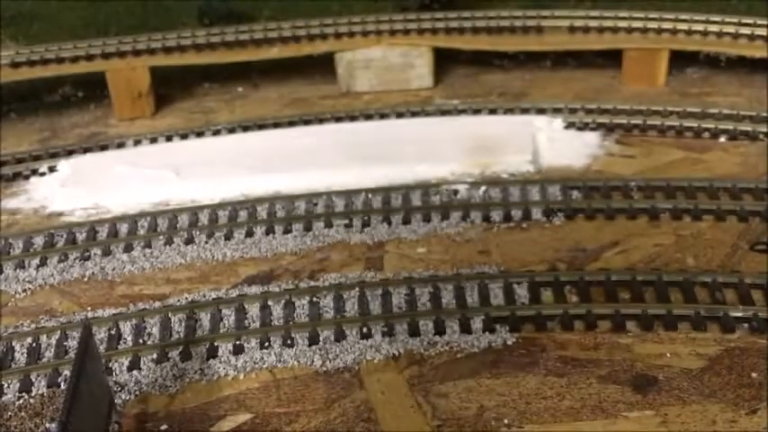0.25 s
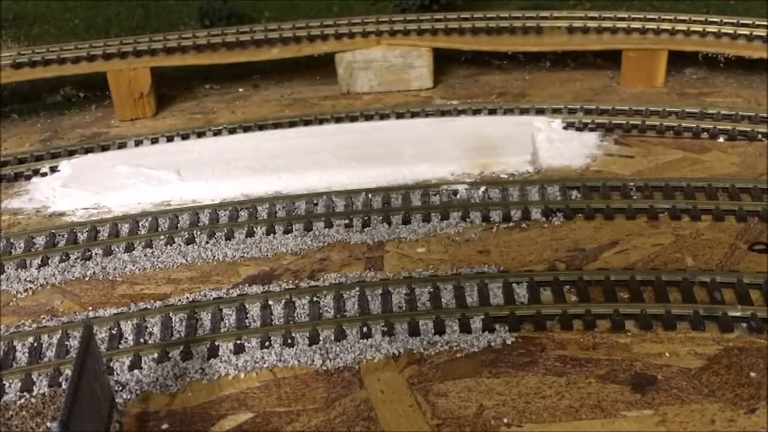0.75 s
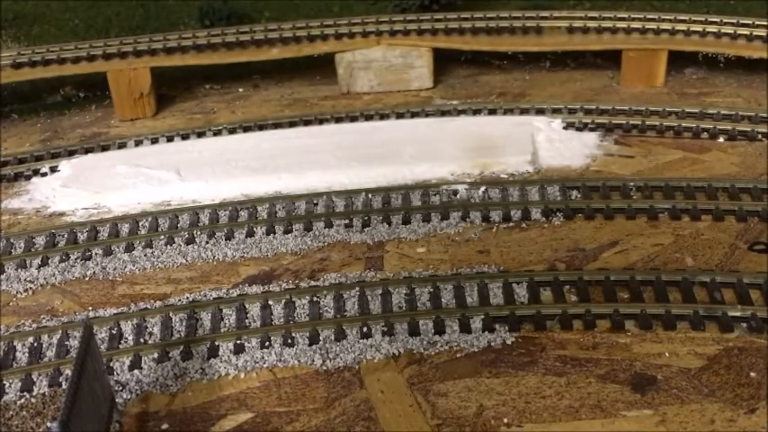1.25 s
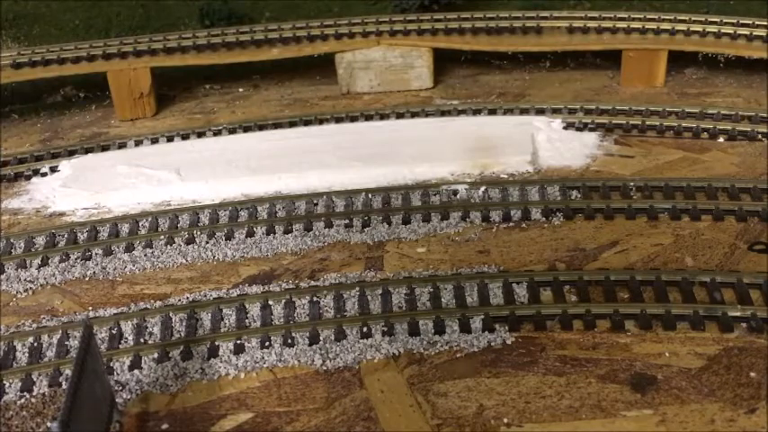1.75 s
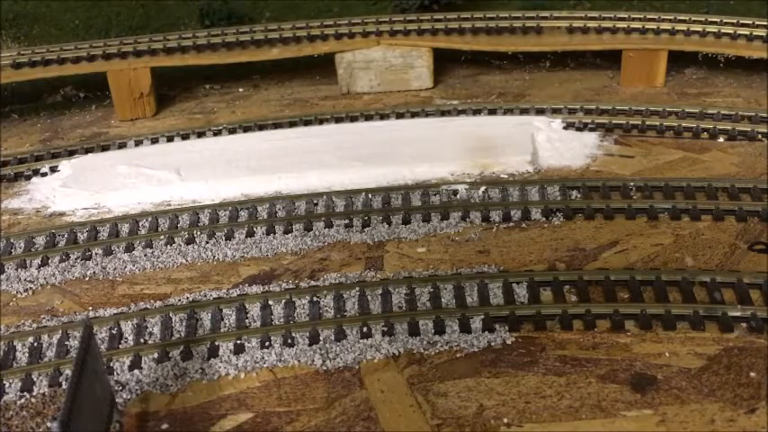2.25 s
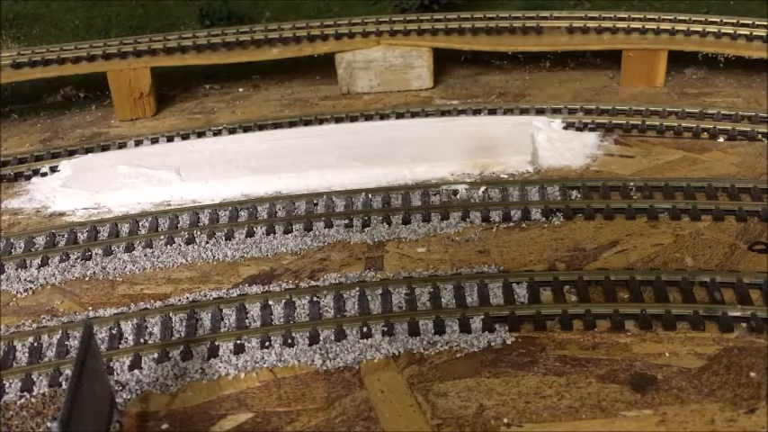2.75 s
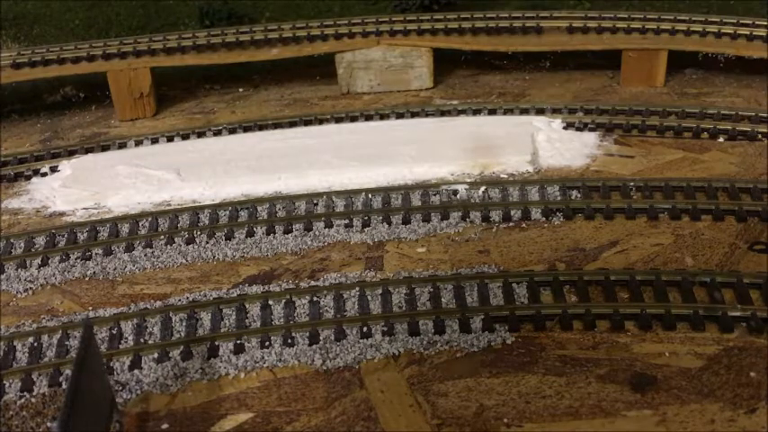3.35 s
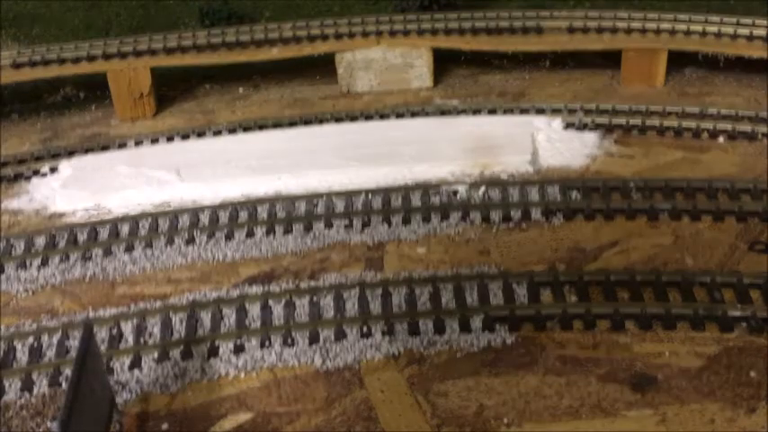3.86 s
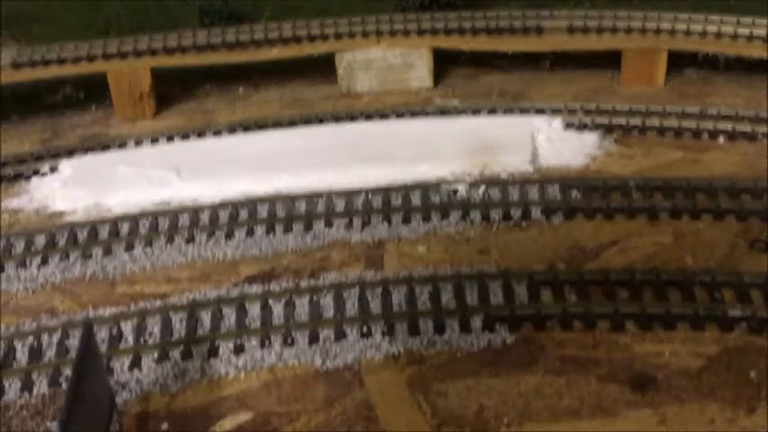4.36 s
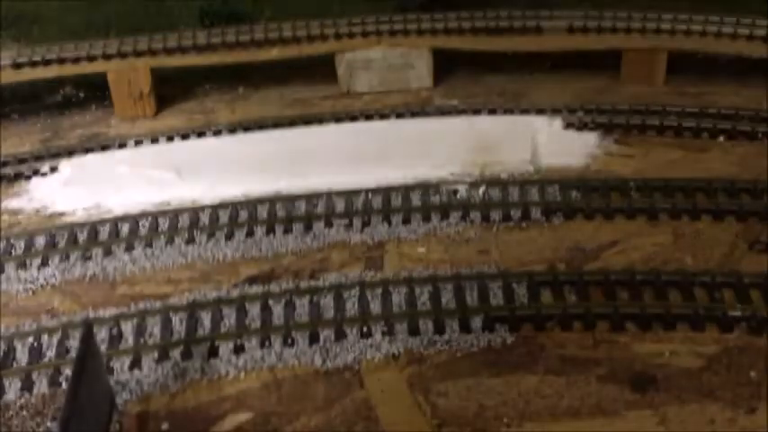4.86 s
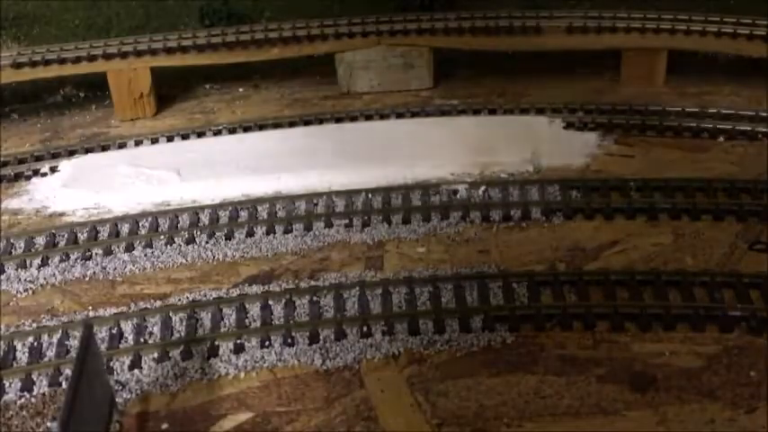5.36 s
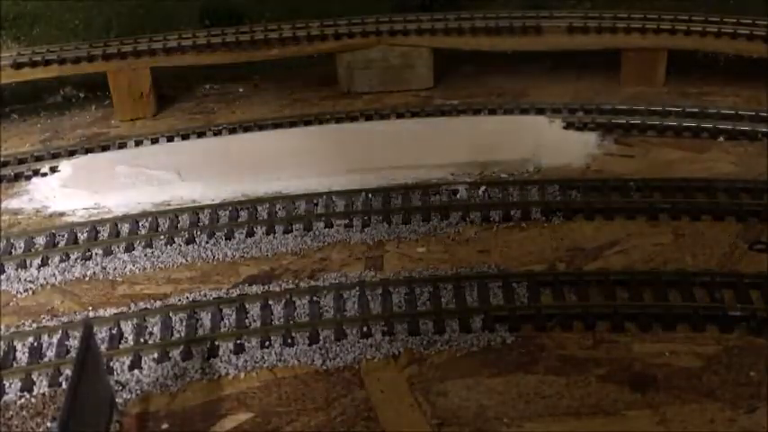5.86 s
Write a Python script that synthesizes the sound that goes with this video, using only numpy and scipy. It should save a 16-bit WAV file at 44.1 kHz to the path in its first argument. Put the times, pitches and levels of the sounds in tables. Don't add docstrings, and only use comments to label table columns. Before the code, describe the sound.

Faint gritty rubbing and dull knocks in a workroom give way to a vacuum's rising whine, loud airy roar and brief hose groan.

```python
import sys
import numpy as np
from scipy import signal
from scipy.fft import rfft, irfft, next_fast_len
from scipy.io import wavfile
from scipy.ndimage import uniform_filter1d, map_coordinates

SR = 44100
rng = np.random.default_rng(int(sys.argv[2]) if len(sys.argv) > 2 else 0)


def materialize(psi):
    bounded = np.clip(np.atleast_2d(psi).T, -1, 1)
    quanta = np.round(bounded * 32767).astype(np.int16)
    wavfile.write(sys.argv[1], SR, quanta)


def gain_from_decibels(decibels):
    exponent = np.asarray(decibels, float) / 20
    return 10 ** exponent


N = 269892
SWITCH_S, FULL_HZ = 2.42, 419.6


def unit(x):
    return x / np.sqrt(np.mean(x ** 2) + 1e-20)


def along(points, hz):
    f, v = np.transpose(points)
    return np.interp(np.log(hz + 1), np.log(f + 1), v)


def curve(rows):
    s, value = np.transpose(rows)
    return np.interp(np.arange(N) / SR, s, value)


def wobble(rate):
    return map_coordinates(rng.standard_normal(int(N * rate / SR) + 4), [np.arange(N) * rate / SR])


def filtered(x, response):
    m = next_fast_len(N + SR // 2)
    return irfft(rfft(x, m) * response(np.fft.rfftfreq(m, 1 / SR)), m)[:N]


def humps(x, rows):
    return filtered(x, lambda f: gain_from_decibels(sum(db / (1 + (2 * (f - c) / w) ** 2) for c, w, db in rows)))


def rush(spectrum, patchy_db, shape=lambda hz, t: 1):
    hz, t, z = signal.stft(rng.standard_normal(N), SR, nperseg=512)
    field = uniform_filter1d(rng.standard_normal(z.shape), size=6, axis=0)
    field = uniform_filter1d(field, size=10, axis=1)
    z = z * gain_from_decibels(patchy_db * unit(field) + along(spectrum, hz)[:, None]) * shape(hz[:, None], t)
    steady = np.sqrt(uniform_filter1d(np.sum(abs(z) ** 2, 0), size=20))
    return unit(signal.istft(z / steady, SR, nperseg=512)[1][:N])


def swells(rows, levels_db, rise, fall):
    t = np.arange(0, N / SR + .01, .002)
    start, length = np.transpose(rows)[:2, :, None]
    before, after = np.clip(start - t, 0, None), np.clip(t - start - length, 0, None)
    db = np.c_[levels_db] - rise * before - fall * after
    return np.interp(np.arange(N) / SR, t, np.sqrt(np.sum(gain_from_decibels(2 * db), 0)))


def switched(fade):
    return np.clip((np.arange(N) / SR - SWITCH_S) / fade + 1, 0, 1)


# turns per second still missing [Hz], time constant [s]
RUN_UP = [(308, .24), (72, .45)]


def shaft(t):
    since = np.clip(t - SWITCH_S, 0, None)
    missing = sum(gap * np.exp(-since / tau) for gap, tau in RUN_UP)
    return FULL_HZ - missing - 1.75 * np.clip(t - 4.45, 0, None)


# f/Hz, time to fall by 60 dB [s]
ROOM_DECAY = [(200, 0.77), (2000, 0.4), (10000, 0.14)]


def room(x, wet_db):
    hop, wet = round(.2 * SR), np.zeros(N + 2 * SR)
    for start in range(round(2.2 * SR), N, hop):
        hz, t, z = signal.stft(rng.standard_normal(SR // 2), SR, nperseg=256)
        tail = signal.istft(z * gain_from_decibels(-60 * t / along(ROOM_DECAY, hz)[:, None]), SR, nperseg=256)[1]
        piece = x[start:][:2 * hop]
        window = np.sin(np.pi * np.arange(len(piece)) / (2 * hop))
        echo = signal.fftconvolve(piece * window, tail / np.linalg.norm(tail))
        wet[start + 150:][:len(echo)] += echo
    return (x + gain_from_decibels(wet_db) * wet[:N]) / np.sqrt(1 + gain_from_decibels(2 * wet_db))


# f/Hz, level/dB per Hz
STILL = [(300, 0), (700, -12.5), (1500, -17.5), (3000, -17.5), (5000, -22.5), (7000, -22), (10500, -22.5),
         (13000, -17.5), (16500, -22)]


def still():
    return gain_from_decibels(-68.5) * rush([(150, -34)] + STILL, 0.76)


# t/s, length [s], level/dB, f/Hz
JOLTS = [(0.03, 0.053, -44, 60.7), (0.163, 0.17, -39, 59), (0.408, 0.036, -46, 94),
         (0.668, 0.065, -48.5, 81), (.8, .05, -54, 140), (1.09, 0.15, -43, 106.4), (1.297, .1, -48.5, 101),
         (1.564, 0.062, -46.5, 69), (1.674, 0.023, -43, 127), (2.027, 0.027, -50.5, 60),
         (2.145, 0.058, -45, 170), (2.313, 0.034, -52, 192), (2.505, 0.097, -48, 180),
         (2.695, 0.22, -42, 70.4), (3.08, 0.016, -37, 179), (3.866, 0.078, -34, 55), (4.15, 0.055, -39, 48),
         (4.257, .02, -39, 170), (4.446, 0.13, -34, 168), (4.923, 0.23, -41, 47.7),
         (5.218, 0.1, -38.5, 40.4), (5.38, 0.09, -40.5, 48), (5.488, 0.04, -42, 150),
         (5.664, 0.028, -45, 170), (5.793, 0.066, -45.5, 60), (5.944, 0.061, -44.5, 119)]
# f/Hz, width [Hz]
BENCH_MODES = [(48, 80), (88, 82), (180, 35)]
REST_DB = [-54.5, -55, -59.5]
# f/Hz, width [Hz], level/dB
OVERTONE = (287, 63, -14)


def bench_ring(c, w):
    response = lambda f: (1j * f * w / (c * c - f * f + 1j * f * w)) ** 2
    return unit(filtered(rng.standard_normal(N), response))


def bench():
    db, hz = np.transpose(JOLTS)[2:]
    out = np.zeros(N)
    for rest_db, (c, w) in zip(REST_DB, BENCH_MODES):
        jolt_db = db - 13 * np.log2(hz / c) ** 2
        level = np.hypot(gain_from_decibels(rest_db + 1.5 * wobble(8.0)), swells(JOLTS, jolt_db, 347, 162))
        out += level * bench_ring(c, w)
    over_hz, width_hz, over_db = OVERTONE
    return out + level * gain_from_decibels(over_db) * bench_ring(over_hz, width_hz)


# t/s, peak level/dB, ring level/dB, ping f/Hz
KNOCKS = [(0.808, -55, -28, 4540), (0.8237, -33, -31, 5200), (0.824, -34.5, -29, 5460),
          (0.824, -39, -26, 4140), (0.836, -41, -30, 5350), (0.827, -31, -19, 1466), (1.396, -48, 0, 1080),
          (1.409, -40, 3.5, 2820), (1.453, -47, -9, 1120), (1.578, -54, -12, 2130), (1.592, -53, -10, 1050),
          (2.419, -39, 4.5, 465)]
# f/Hz, level/dB, time to fall by 60 dB [s]
BLOCK_MODES = [(433, 5, 0.12), (1050, -7, 0.083), (2910, -13, 0.038), (3180, -10, 0.051)]
# t/s, peak level/dB, f/Hz
THUMPS = [(0.187, -17, 87), (0.12, -36, 280), (0.16, -34, 260), (0.2, -32, 290), (0.245, -33, 270),
          (0.292, -31.5, 300), (0.21, -36, 61.7), (0.24, -19, 79), (0.329, -47, 47.7), (1.079, -25, 81.6),
          (1.139, -22.5, 108), (1.298, -30, 91.5), (1.568, -35, 135), (1.595, -25.5, 217), (1.623, -32, 90),
          (1.672, -25, 136), (1.678, -26, 228), (1.7, -46, 149), (2.141, -28, 182), (3.857, -29, 98),
          (4.247, -5, 95.3), (4.236, -18, 184), (4.165, -24, 48), (4.36, -20, 80), (5.03, -27, 46),
          (5.44, -28, 58)]


def knocks():
    out, t = np.zeros(N + SR), np.arange(SR // 4) / SR
    for s, db, ring_db, ping_hz in KNOCKS:
        ring = sum(gain_from_decibels(level + rng.normal(0, 0.8) - 60 * t / t60) * np.sin(2 * np.pi * hz * t)
                   for hz, level, t60 in BLOCK_MODES)
        scrape = np.diff(uniform_filter1d(rng.standard_normal(len(t) + 1), size=7)) * 2.4
        scuff = gain_from_decibels(2.0 - 60 * t / 0.025) * scrape * min(1, 2000 / ping_hz)
        ping = gain_from_decibels(-60 * t / 0.023) * np.sin(2 * np.pi * ping_hz * t)
        tap = (gain_from_decibels(ring_db) * ring + scuff + ping) * (1 - np.exp(-t / 0.002))
        out[round(s * SR):][:len(t)] += gain_from_decibels(db - 5.0) * tap
    for s, db, hz in THUMPS:
        swell = np.exp(-t * hz / 2.1) * (1 - np.exp(-t * hz / 1.24))
        out[round(s * SR):][:len(t)] += gain_from_decibels(db - 3.5) * swell * np.sin(2 * np.pi * hz * t)
    return out[:N]


# t/s, length [s], level/dB, centre f/Hz, width [Hz]
SNAGS = [(.012, .008, -59, 2500, 900), (0.018, .006, -52, 7500, 7000), (.062, .003, -62, 8000, 8000),
         (0.04, 0.02, -52, 2600, 500), (0.067, .005, -55, 2600, 600), (0.112, .006, -64, 2500, 900),
         (0.216, .006, -52, 2700, 800), (0.232, .012, -50, 2300, 2000), (0.248, .015, -58, 2900, 500),
         (0.287, .004, -46, 2200, 2800), (0.299, .005, -54, 2700, 800)]
# t/s, peak level/dB
TICKS = [
    (.81, -50),
    (.8252, -41),
    (.8281, -38),
    (.8293, -38),
    (.8315, -36),
    (.84, -49),
    (.2895, -38),
    (.2925, -36),
    (.299, -41),
    (.301, -41),
]


def snags():
    out, t = np.zeros(N), np.arange(4096) / SR
    f = np.fft.rfftfreq(len(t), 1 / SR)
    for s, length, db, c, w in SNAGS:
        band = unit(irfft(rfft(rng.standard_normal(len(t))) / (1 + (2 * (f - c) / w) ** 4)))
        fade = gain_from_decibels(db - 60 * np.clip(t - length, 0, None) / 0.053)
        out[round(s * SR):][:len(t)] += fade * (1 - np.exp(-t / 0.0012)) * band
    for k, (s, db) in enumerate(TICKS):
        sign = -1 if k == 3 else 1
        tick = np.sin(2 * np.pi * 3000 * t) * np.exp(-t / .00015)
        out[round(s * SR):][:len(t)] += sign * gain_from_decibels(db + 6) * tick
    return out


# t/s, length [s], level/dB, rasp from pressure [dB], hiss from speed [dB]
STROKES = [(0.009, 0.053, -52, -5, 1), (0.107, 0.078, -53.5, 1.5, 0.5), (0.198, 0.067, -50.5, 2, -2),
           (0.29, 0.02, -50.5, 4.5, -5), (.325, .02, -61, 7, -3), (.39, 0.045, -69.5, -3, 3),
           (0.46, 0.12, -62, 2, -2.5), (0.627, .11, -59, 3, 0), (0.76, 0.033, -61.5, 6, -15),
           (0.823, 0.0071, -53, 5, -21), (0.848, 0.018, -57, 2.5, -9), (1.009, 0.019, -65, 8.5, -13),
           (1.083, 0.018, -60, 9, -6), (1.18, .04, -68.5, 7, -0.5), (1.3, .02, -70, 2, -2),
           (1.416, 0.013, -55, 2.5, -4), (1.445, 0.017, -70, 10, -7), (1.582, 0.023, -63, 5.5, -14),
           (1.62, 0.093, -66.5, -2, 4), (1.76, 0.02, -67, -8, 5.5), (2.07, 0.065, -73, 11, -6),
           (2.15, .03, -62.5, -1, -6), (2.186, 0.097, -56.5, 1.5, -8.5), (2.313, .035, -67, 4, -6)]
# f/Hz, level/dB per Hz
GRIT = [(1200, -10.5), (2000, -4), (2700, -2), (4000, -8.5), (5000, -18), (6200, -8), (7500, -28),
        (9000, -67)]
RASP = [(250, 2.5), (420, -4), (700, -8.5), (1100, -6.5), (1700, -8), (2300, -25), (3000, -46)]
HISS = [(5500, -6), (7000, -7), (9000, -5.5), (10600, -7), (13000, -4), (15500, -4.5), (17000, -6)]


def sanding():
    db, press_db, skim_db = np.transpose(STROKES)[2:]
    grit, rasp, hiss = (swells(STROKES, level, 502, 248) for level in (db, db + press_db, db + skim_db))
    catch = 1.6 * wobble(50) + 2.2 * wobble(350)
    out = grit * gain_from_decibels(catch - 3.0) * rush(GRIT, 2.0)
    out += rasp * gain_from_decibels(0.66 * catch - 1.5) * rush(RASP, 2.2)
    return out + hiss * gain_from_decibels(0.5 + 0.33 * catch) * rush(HISS, 2)


# f/Hz, level/dB per Hz
SPARK = [(2500, -8), (4000, -6), (6200, -2), (7400, -9), (8000, -20), (14000, -12), (16000, -16)]
# f/Hz, level/dB per Hz
GULP = [(500, -5), (800, -2), (1200, 7), (1600, 0), (2200, -18), (3500, -26)]
# f/Hz, level/dB per Hz
PUFF = [(1800, -20), (2800, 0), (3300, 0), (4300, 1), (5000, -8), (6200, -1), (9000, -11), (15500, -11)]


def spark():
    t = np.arange(N) / SR - 2.408
    burn = gain_from_decibels(-46 - 60 * np.clip(t - 0.03, 0, None) / 0.34) * np.clip(t / 0.016, 0, 1)
    gulp = (t > .012) * swells([(2.445, 0.083)], [-45], 220, 230)
    puff = swells([(2.51, 0.077)], [-50.5], 300, 100)
    return burn * rush(SPARK, 1.1) + gulp * rush(GULP, 1.4) + puff * rush(PUFF, 2.0)


# f/Hz, width [Hz], level/dB
WHISTLES = [(4343, 40, -52), (4801, 20, -51), (6104, 60, -52), (2311, 30, -54), (759, 30, -51),
            (3339, 30, -52)]
# t/s, length [s]
LIFTED = [
    (4.15, .55),
]


def whistles():
    share = shaft(np.arange(N) / SR) / FULL_HZ
    sing = 1 + swells(LIFTED, [-1.5], 30, 40)
    out = np.zeros(N)
    for c, w, db in WHISTLES:
        tone = unit(filtered(rng.standard_normal(N), lambda f: 1 / (1 + (2 * (f - c) / w) ** 2)))
        out += gain_from_decibels(db) * (sing if c == WHISTLES[0][0] else 1) * tone
    return share ** 12 * out


# t/s, length [s], level/dB, tilt [dB an octave]
TUGS = [
    (4.244, .03, -41.5, 4),
    (4.342, 0.053, -25, -5),
    (4.42, .03, -32, -9),
    (4.47, 0.072, -22.5, -5),
    (4.535, .05, -39.5, 17),
    (4.635, 0.03, -40.5, 15.5),
]
# t/s, ribs per second f/Hz
RIBS = [(4.25, 32.3), (4.35, 37.1), (4.4, 40.3), (4.45, 43), (4.5, 44.4), (4.56, 45.4), (4.65, 51.3),
        (4.72, 55)]
RIB_DB = [-15, 0.5, -14, -16]


def hose():
    turn = 2 * np.pi * np.cumsum(curve(RIBS) * (1 + .008 * wobble(30))) / SR
    db, bright_db = np.transpose(TUGS)[2:]
    out = np.zeros(N)
    for k, level in zip((2, 3, 4, 6), RIB_DB):
        out += swells(TUGS, db + level + bright_db * np.log2(k / 3), 347, 296) * np.sin(k * turn)
    return np.sqrt(2) * out


def air_shape(hz, t):
    slot_hz = 12 * shaft(t)
    near = hz / slot_hz
    lag = 1 - shaft(t) / FULL_HZ
    edge = (1 + near ** 8) ** (-.15 - 0.049 * lag)
    awake = 1 - np.exp(-np.clip(t - SWITCH_S - .022, 0, None) / .022)
    hiss = (1 + (hz / 5000) ** 8) ** (0.18 * awake)
    bunch = 1 + 2.6 * lag * np.exp(-((near - .97) / .08) ** 2)
    lean = np.clip(np.maximum(hz, 1300) / slot_hz, .1, 1) ** (0.17 * lag)
    growl = 1 + 0.9 * lag / (1 + (hz / 735) ** 4)
    return edge * hiss * bunch * lean * growl


# f/Hz, level/dB per Hz
ROAR = [(200, -26), (300, -19.5), (450, -16.5), (520, -28.5), (650, -16), (800, -23), (950, -16),
        (1300, -15.5), (1800, -17), (2300, -18.5), (2900, -15), (4200, -20), (5200, -21.5), (7000, -31)]
JET = [(3500, -24), (5000, -3.5), (6100, 5.5), (7000, 0.5), (8000, -2.5), (9300, 2), (11000, -7),
       (13800, -6), (15500, -13), (15900, -18)]
# f/Hz, width [Hz], level/dB
CASING = [(472, 26, 5), (757.5, 53, 8), (1129, 190, 3.5), (1204, 48, -3.5), (1353, 153, 3.5),
          (1617, 200, 3), (1820, 99, -1.5), (1987, 260, 3), (2360, 40, 3), (2600, 31, -1), (2870, 110, 2.5),
          (3318, 130, 4), (4217, 125, 5), (4830, 59, -6)]
NOZZLE = [(6110, 200, 5.5), (6870, 170, 6), (7690, 280, 5), (7930, 240, -4), (9010, 200, 2.5),
          (9600, 390, 2), (10450, 350, -7), (11200, 300, 3), (11700, 400, -16), (12300, 300, 8),
          (12500, 440, 4), (13730, 300, 9), (14400, 400, -4), (15400, 500, 2)]


def air():
    share = shaft(np.arange(N) / SR) / FULL_HZ
    gust = 0.37 * wobble(8) + 0.76 * wobble(300)
    roar = (share ** 1.84 + 0.061) * gain_from_decibels(-29 - 1.5 + gust) * humps(rush(ROAR, 1.2, air_shape), CASING)
    jet = (share ** 2.5 + 0.035) * gain_from_decibels(-35.5 - 3.0 + gust) * humps(rush(JET, 0.84), NOZZLE)
    return switched(0.024) * (room(roar, -7) + room(jet, -5.5))


# f/Hz, level/dB
MOUNT = [(120, -75), (180, -36), (210, -29), (240, -39), (265, -24), (290, -36), (312, -32), (328, -44),
         (345, -30), (358, -36), (372, -27), (385, -26.5), (419, -26)]
# t/s, level/dB
NEAR = [(3.3, -3), (3.62, 1), (3.95, -1.5), (4.15, 0), (5.1, 0.6), (6.12, -2.5)]
# f/Hz, level/dB
BLADES = [(1300, -66), (2050, -46), (2270, -45), (2390, -57), (2428, -33), (2465, -50), (2490, -38),
          (2495, -46), (2510, -41)]
# f/Hz, level/dB
SLOTS = [(800, -62), (1250, -50), (1650, -50), (2100, -55), (2500, -49), (2750, -47), (3050, -52),
         (3350, -45), (3600, -47), (3850, -43), (4100, -45), (4350, -41), (4600, -43), (4800, -44),
         (4900, -47), (4990, -51), (5030, -50)]
TWICE = [(2500, -72), (3300, -56), (3800, -64), (4350, -53), (4900, -66), (6200, -62), (7000, -72)]
ORDERS_AT = [2, 8, 24]
ORDERS_DB = [(-45, 0.45), (-58, 0.54), (-57, 0.6)]


def motor():
    t = np.arange(N) / SR
    speed = shaft(t)
    lag, turn = abs(1 - speed / FULL_HZ), 2 * np.pi * np.cumsum(speed) / SR
    out = gain_from_decibels(along(MOUNT, speed) + curve(NEAR) + 0.49 * wobble(25)) * np.sin(turn + 0.16 * wobble(38))
    blade_db = along(BLADES, 6 * speed) + .8 * wobble(7) + 1.5 * wobble(20)
    out += gain_from_decibels(blade_db) * np.sin(6 * turn + .3 * wobble(25))
    slot_db = along(SLOTS, 12 * speed) + 1.5 * wobble(6) + 2.2 * wobble(30)
    out += gain_from_decibels(slot_db) * np.sin(12 * turn + (.5 + .5 * lag ** 2) * wobble(70))
    out += gain_from_decibels(along(TWICE, 24 * speed) + 2.5 * wobble(40)) * np.sin(24 * turn + 2.5 * wobble(600))
    for k, (db, waver) in zip(ORDERS_AT, ORDERS_DB):
        level = gain_from_decibels(db - 1.5 + 4 * wobble(4)) * (speed / FULL_HZ) ** 4
        out += level * np.sin(k * turn + waver * wobble(25))
    hum_hz, rise = 100, 1 - np.exp(-np.clip(t - SWITCH_S, 0, None) / 0.087)
    hum_db = -41.5 + 16.5 * lag ** 0.58 + 1.3 * wobble(14)
    hum = rise * gain_from_decibels(hum_db) * np.sin(2 * np.pi * hum_hz * t + 0.3 * wobble(4.5))
    buzz = rise * gain_from_decibels(-40.5) * np.exp(-abs(t - SWITCH_S) / 0.11) * np.sin(8 * np.pi * hum_hz * t)
    return np.sqrt(2) * (out * switched(0.0068) + hum + buzz)


def scene():
    background = still() + bench() + knocks() + snags()
    mono = background + sanding() + spark() + whistles() + hose() + air() + motor()
    return np.array([mono, mono])


COARSE_AT = [7.2, 22, 29, 31, 32, 38, 40, 50.85, 77, 86, 89, 126, 145, 146, 151, 154, 156, 162, 165, 178,
             186, 197, 218, 220, 221, 225, 227, 269, 272, 274, 277]
# f/Hz, rounding step [local rms]
COARSENESS = [(300, 0.16), (700, 1.8), (2000, 2.6), (6000, 3.1), (9000, 4.39), (15000, 5.4)]
EXTRA_DB = 2.3, .4
SHARP = [7.2, 50.85]
EMPTY_OVER = {7.2: 4400, 38: 5800, 50.85: 4900, 126: 5600}


def coarse_moments(x):
    hop = 1024 * 44100 / 48000
    m = round(hop)
    n, k = np.arange(2 * m), np.arange(m)
    hz = k * SR / (2 * m)
    sharp = signal.windows.kaiser_bessel_derived(2 * m, 4 * np.pi)
    window = np.where(np.isin(COARSE_AT, SHARP)[:, None], sharp, np.sin(np.pi * (n + .5) / (2 * m)))
    basis = np.cos(np.pi / m * np.outer(k + .5, n + .5 + m / 2)) * np.sqrt(2 / m)
    spots = np.round(740 + hop * np.array(COARSE_AT)).astype(int)[:, None] - m + n
    lines = (x[spots] * window) @ basis.T
    local = np.sqrt(abs(uniform_filter1d(lines ** 2, size=40, axis=1))) + 1e-9
    luck_db = 1.1 * np.repeat(rng.standard_normal((len(COARSE_AT), 60)), 16, axis=1)[:, :m]
    luck = gain_from_decibels(np.where(spots[:, :1] < SWITCH_S * SR, *EXTRA_DB) + luck_db)
    step = local * luck * along(COARSENESS, hz)
    step[COARSE_AT.index(38), hz < 5700] *= gain_from_decibels(-13)
    kept = gain_from_decibels(1.0) * step * np.sign(lines) * np.floor(abs(lines) / step + .4)
    kept *= hz < np.c_[[EMPTY_OVER.get(moment, SR) for moment in COARSE_AT]]
    return x + np.bincount(spots.ravel(), ((kept - lines) @ basis * window).ravel(), N)


# t/s, low f/Hz, high f/Hz, level/dB
SIDE_BURSTS = [(1.209, 13780, 15160, -78), (1.304, 6930, 8270, -81), (1.881, 12450, 13780, -86),
               (1.882, 14470, 15850, -81), (2.02, 6930, 7620, -84), (2.115, 13090, 14470, -84),
               (2.118, 6850, 8100, -84), (2.908, 6290, 7580, -45), (2.939, 11870, 14430, -47),
               (2.949, 9000, 10290, -46), (3.276, 5200, 6330, -41), (3.741, 11020, 12400, -48),
               (3.742, 8270, 9650, -42), (3.765, 13090, 14510, -46), (3.767, 4160, 5600, -39),
               (3.952, 5140, 6300, -40), (3.953, 13780, 15160, -46), (4.065, 5680, 6890, -38),
               (4.322, 5730, 6750, -36), (4.903, 6330, 7500, -40), (5.043, 5680, 6740, -38),
               (5.482, 7660, 8960, -43)]


def side_bursts():
    out, m = np.zeros(N), 1024
    n, window = np.arange(2 * m), signal.windows.kaiser_bessel_derived(2 * m, 4 * np.pi)
    for s, low_hz, high_hz, db in SIDE_BURSTS:
        k = np.arange(round(low_hz * 2 * m / SR), round(high_hz * 2 * m / SR))
        band = rng.standard_normal(m)[k] @ np.cos(np.pi / m * np.outer(k + .5, n + .5 + m / 2))
        start = 142 + m * round((s * SR - 142) / m - 1)
        out[start:][:2 * m] += gain_from_decibels(db - 3.0) * unit(band) * window
    return out


def band_limit(x):
    return signal.sosfilt(signal.butter(12, 16930, fs=SR, output="sos"), x)


def record(dry):
    band = lambda hz: (hz < 15745) / (1 + (32 / (hz + 1)) ** 6)
    mono, side = filtered(coarse_moments(dry[0]), band), side_bursts()
    return band_limit(np.array([mono + side, mono - side]))


dry = scene()
out = record(dry)
materialize(out)
```